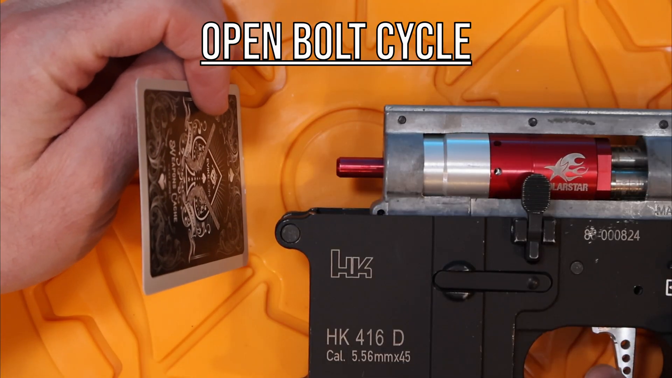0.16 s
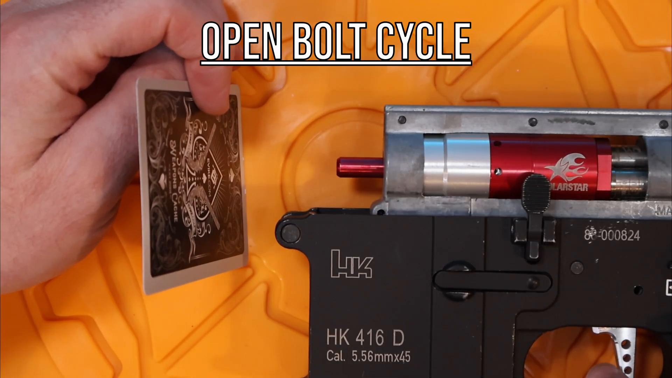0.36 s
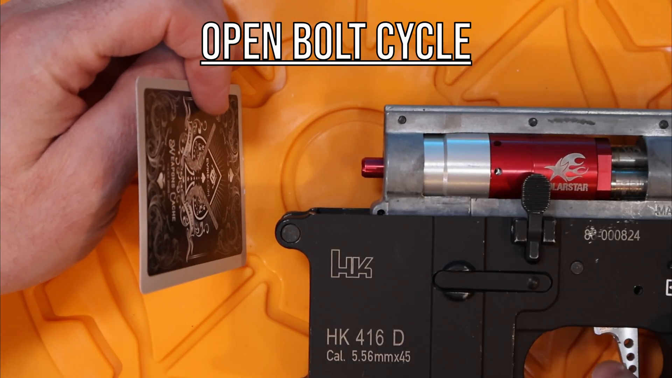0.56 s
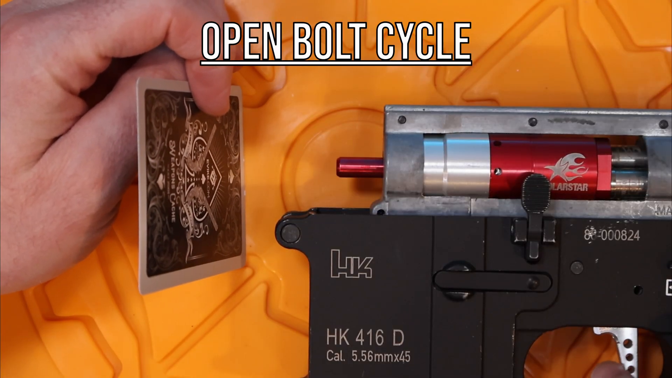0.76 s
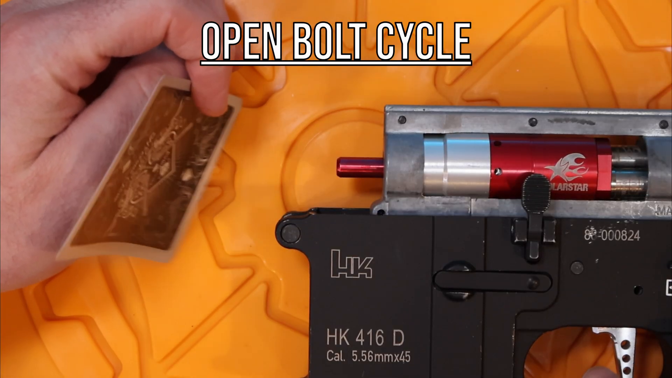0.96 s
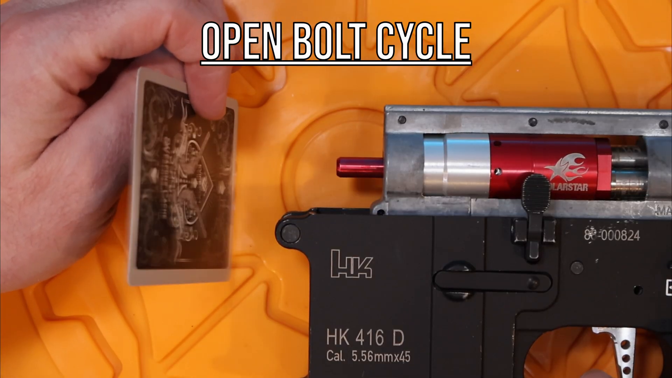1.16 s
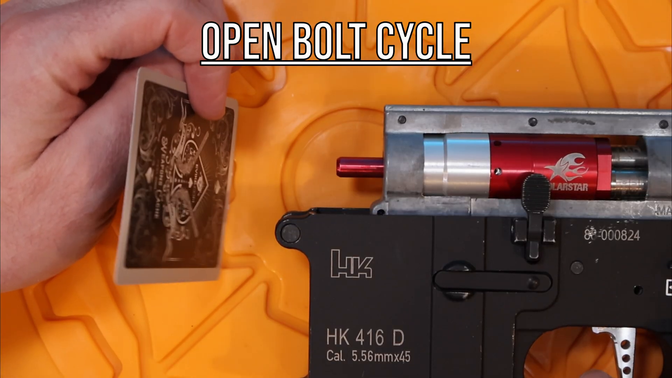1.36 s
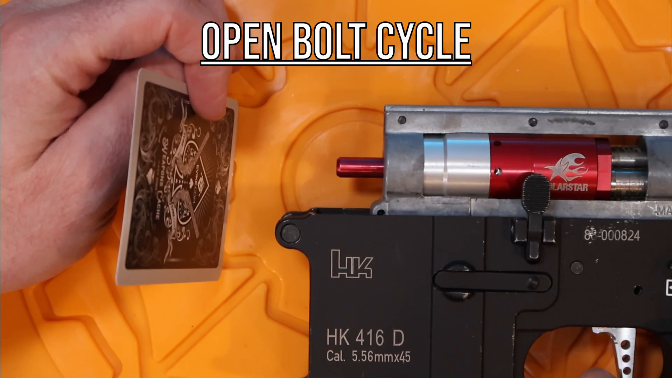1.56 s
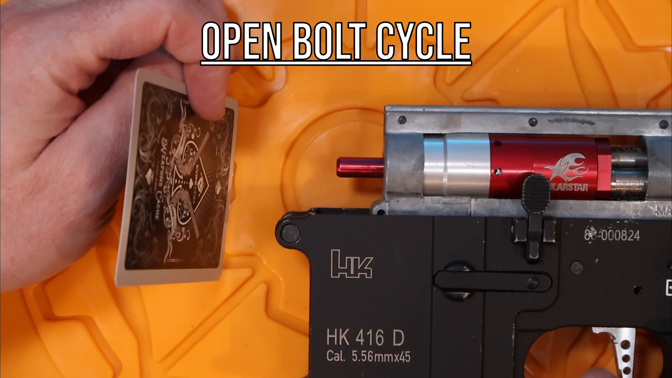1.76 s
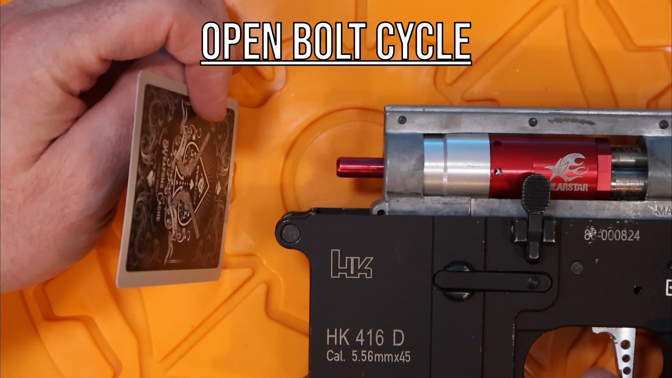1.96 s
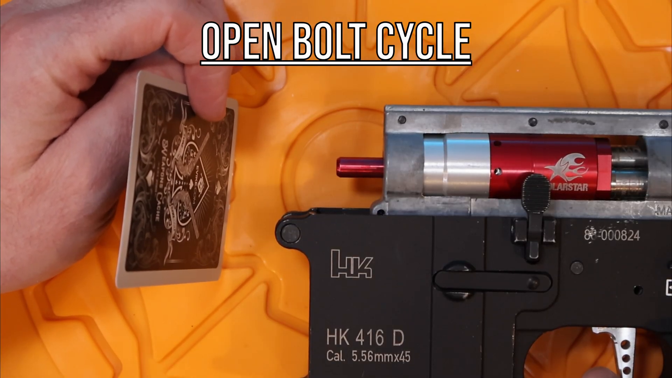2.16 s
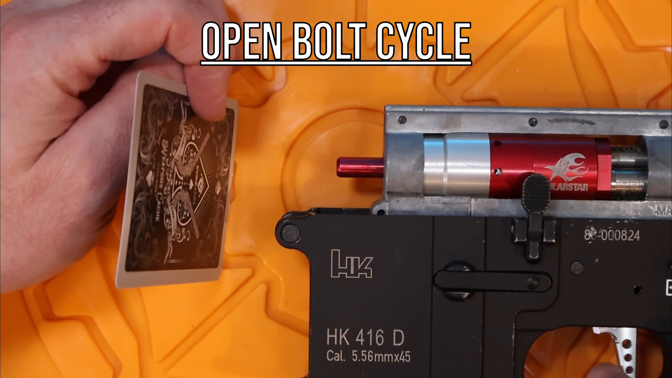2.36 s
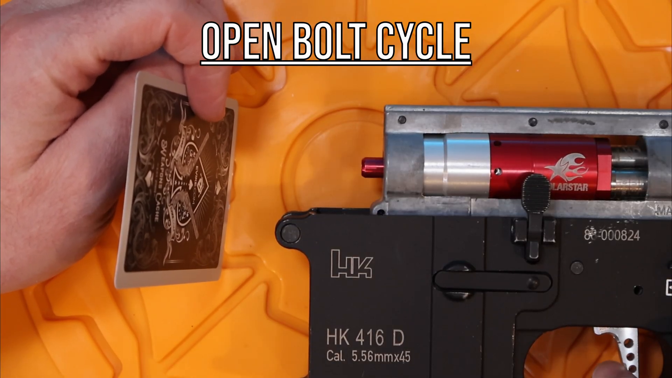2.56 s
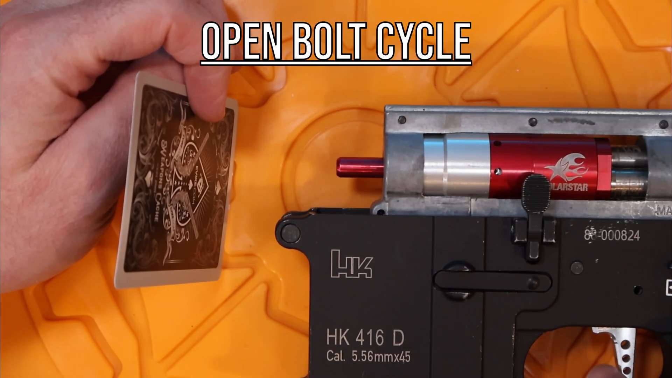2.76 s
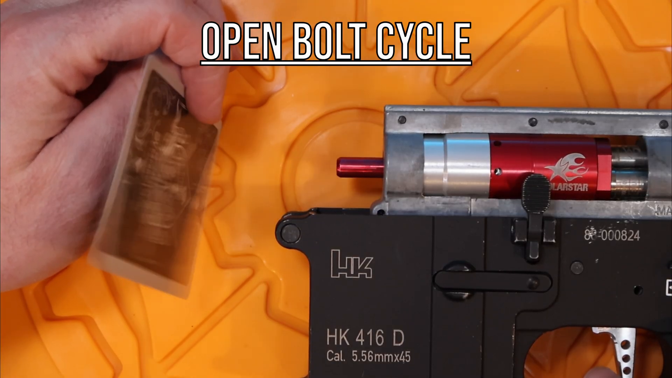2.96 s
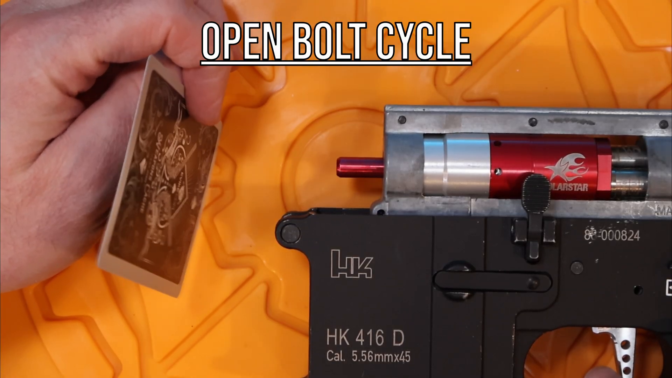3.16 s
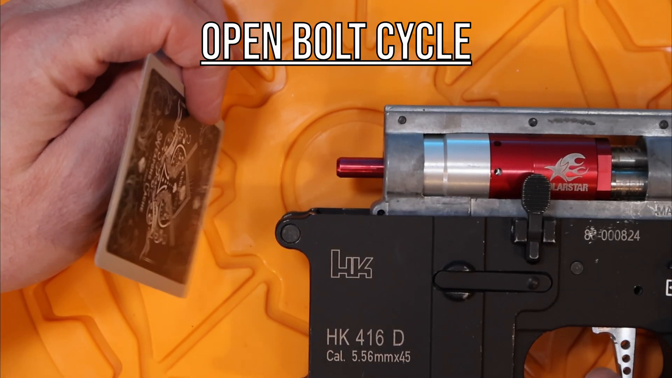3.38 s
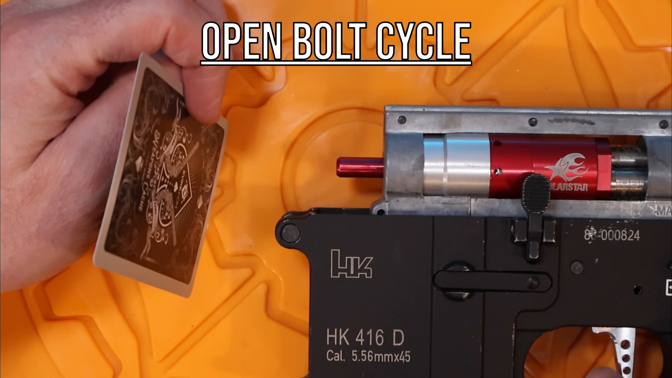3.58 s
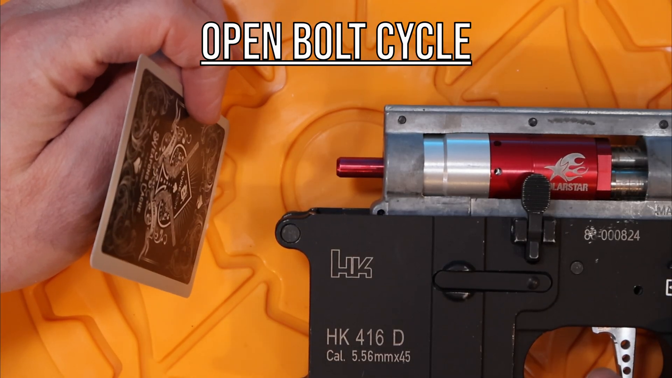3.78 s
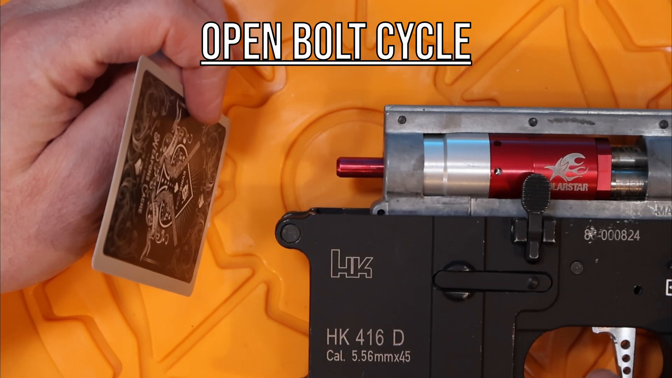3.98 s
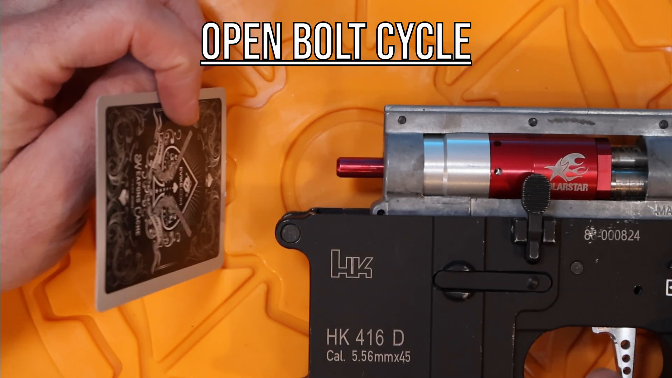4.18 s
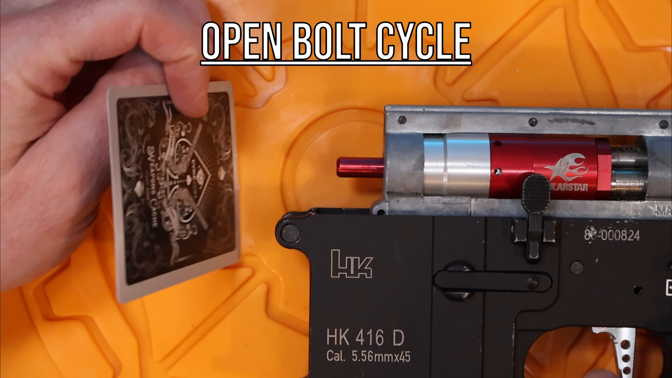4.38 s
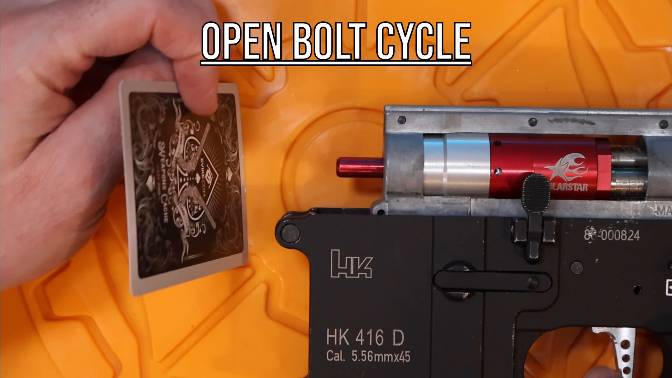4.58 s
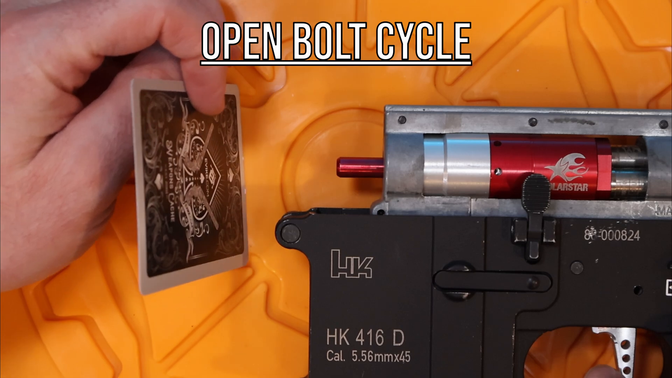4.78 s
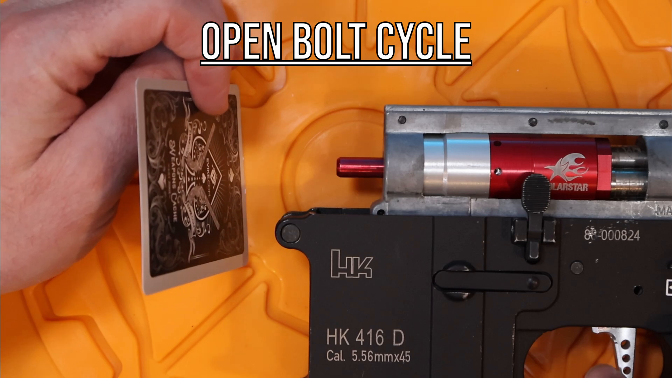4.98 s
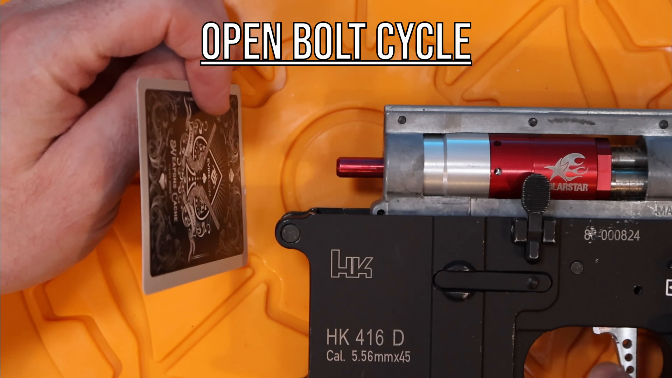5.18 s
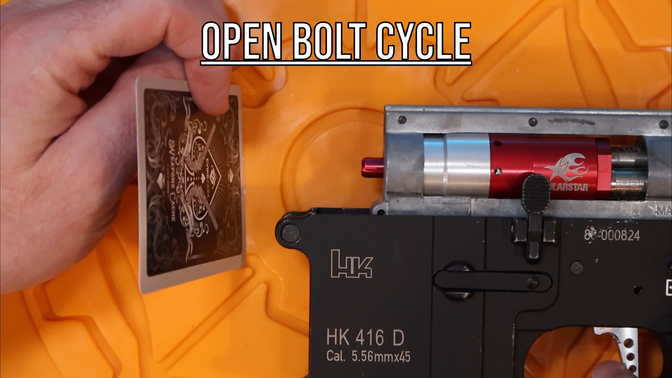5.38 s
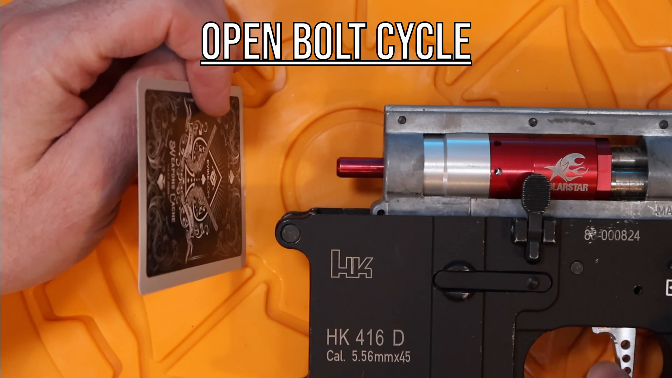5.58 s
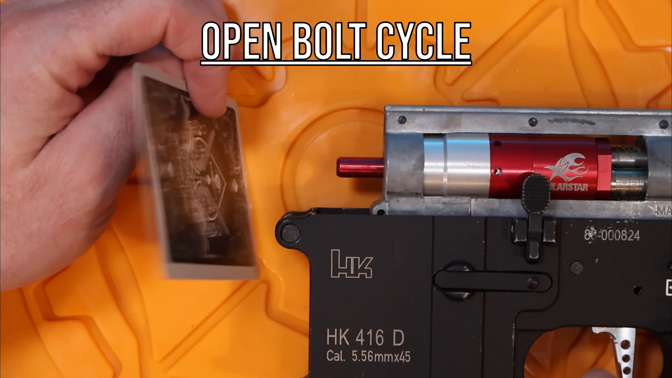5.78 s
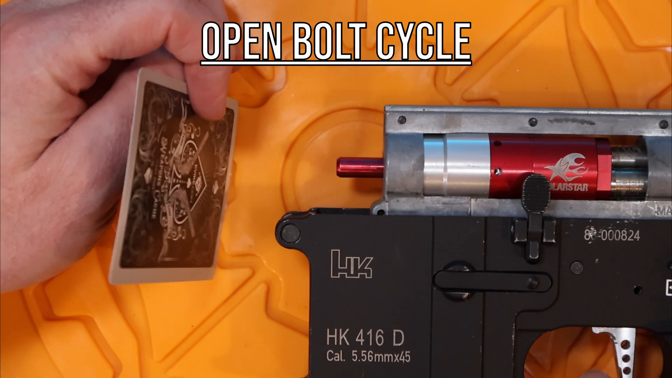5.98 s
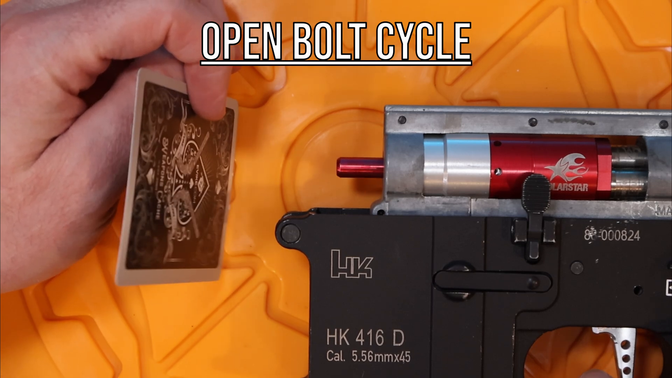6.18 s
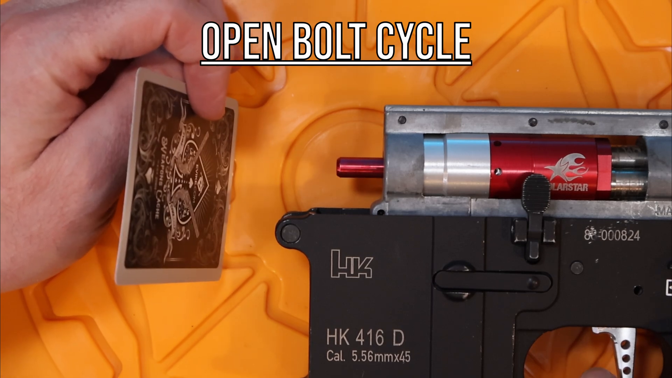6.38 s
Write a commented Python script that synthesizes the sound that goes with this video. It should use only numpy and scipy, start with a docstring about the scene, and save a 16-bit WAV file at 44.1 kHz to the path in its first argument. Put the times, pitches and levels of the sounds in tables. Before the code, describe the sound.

A faint low drone with a little hiss fills a small room throughout. At about 0.6 seconds an air-powered replica gun begins to cycle: its nozzle slams back with a ringing, rattling metallic click, pops forward with a short hiss at 0.8, and at 1.0 a sharp blast of air slaps a playing card, followed at once by a valve clacking shut. After tiny trigger ticks at 2.5 seconds, the same sequence runs from 2.6 to 3.1, with a softer slap on the card. Another faint tick comes at 4.6. The third firing runs from 5.4 to 5.9, with the firmest slap. Everything is slowed to half speed at normal pitch, so most hits have a brief stutter. The microphone is close, dipping in level and distorting slightly on the loudest hits, each trailed by a short room echo.

```python
"""In a small, droning room, an air-driven replica gun engine on a plastic case fires three times.
Each time its nozzle slams back, then pops forward with a hiss; a blast of air slaps a playing card,
and a valve clacks shut. Struck parts ring, and escaping air is a burst of noise. The close microphone
turns itself down at loud blows and distorts. Everything is then played at half speed by repeating
short slices, so most blows stutter."""
import sys
import numpy as np
from scipy import signal
from scipy.fft import rfft, irfft
from scipy.io import wavfile
from scipy.ndimage import uniform_filter1d

SR = 44100
rng = np.random.default_rng(int(sys.argv[2]) if len(sys.argv) > 2 else 0)


def put_to_file(sound):
    """Save the sound as 16-bit audio at rate SR, in the file named by the first command-line argument."""
    columns = np.atleast_2d(sound).T  # one column per channel
    safe = np.clip(columns, -1, 1)
    whole_steps = np.round(safe * 32767)
    wavfile.write(sys.argv[1], SR, whole_steps.astype(np.int16))


N = 284004
T = np.arange(SR // 2) / SR  # seconds within one blow, before slowing


def amp(db):
    """Turns decibels into a gain."""
    return 10 ** (np.asarray(db) / 20)


def curve_at(points, hz):
    """Reads a table between its rows at the given frequencies."""
    row_hz, value = np.transpose(points)
    return np.interp(np.log(hz + 1), np.log(row_hz + 1), value)


def add(mix, start_s, sound):
    """Mixes a sound in at a time counted before slowing."""
    part = mix[round(start_s * SR):][:len(sound)]
    part += sound[:len(part)]


def noise(spectrum, size):
    """Noise of strength 1, coloured by a table."""
    colour = amp(curve_at(spectrum, np.fft.rfftfreq(size, 1 / SR)))
    hiss = irfft(rfft(rng.standard_normal(size)) * colour, size)
    return hiss / hiss.std()


def ring(modes, scatter_s, crack_db):
    """A quick cluster of contacts makes a crack and tones that fade 60 dB in their ring time."""
    tones = sum(amp(db - 60 * T / ring_s) * np.sin(2 * np.pi * hz * T) for hz, db, ring_s in modes)
    contacts = rng.standard_normal(len(T)) * np.exp(-T / scatter_s)
    contacts[0] = 2 * np.linalg.norm(contacts)  # the first contact is the firmest
    crack = amp(crack_db) * contacts * (T > 0) / 3
    return signal.fftconvolve(tones, contacts / np.linalg.norm(contacts))[:len(T)] + crack


def gust(spectrum, db, rise_s, sag_db, hold_s, fall_s):
    """A burst of noise that starts fast, sags and is cut off."""
    rise = 1 - np.exp(-T / rise_s)
    sag = amp(sag_db * np.exp(-T / .0047))
    fall = np.exp(-np.maximum(T - hold_s, 0) / fall_s)
    return amp(db) * rise * sag * fall * noise(spectrum, len(T))


def bump(at_s, width_s):
    """One smooth push of air."""
    return np.exp(-((T - at_s) / width_s) ** 2)


# The drone's colour. Each row: frequency in Hz, level in dB.
DRONE_COLOUR = [(18, -74.5), (30, -37.5), (48, -31), (138, -8.5), (184, -11.5), (239, -1), (499, -20.5),
                (702, -16.5), (1010, -23.5), (1540, -24.5), (1860, -31), (3220, -32.5), (3490, -33.5),
                (13300, -43.5), (16000, -57.5)]
# Each row: frequency in Hz, how alike the drone is left and right (1 is the same, -1 opposite).
DRONE_LIKENESS = [(60, -0.36), (180, 1), (550, 0.89), (1650, 0.17), (4970, -0.28), (15000, -0.32)]
# The drone's drifting loudness. Each row: time in seconds after slowing, level in dB.
DRONE_LEVEL = [(0, -52.5), (.6, -48), (1.9, -51), (2.5, -48.5), (3.8, -50), (4.14, -51), (4.179, -56.5),
               (4.601, -52), (5.3, -50), (6.44, -52)]
def room_drone():
    """The air in the room carries a low drone and a faint hiss."""
    left, other = rfft(noise(DRONE_COLOUR, N)), rfft(noise(DRONE_COLOUR, N))
    alike = np.clip(curve_at(DRONE_LIKENESS, np.fft.rfftfreq(N, 1 / SR)), -1, 1)
    right = alike * left + np.sqrt(1 - alike ** 2) * other
    slowed_s, db = np.transpose(DRONE_LEVEL)
    return irfft(np.array([left, right]), N) * amp(np.interp(np.arange(N) / SR, slowed_s / 2, db))


# Each row: frequency in Hz, how alike the gun is left and right (1 is the same).
GUN_LIKENESS = [(100, 1), (400, .9), (1200, 0.98), (3000, 0.93), (6000, 0.65), (11000, 0.41), (15000, 0.65)]
# The gun's lean to one side. Each row: frequency in Hz, how much louder the left is in dB.
GUN_BALANCE = [(100, 4), (400, 0.55), (1000, -1.5), (8000, 0)]
def microphone_pair(centre, edge):
    """Two close microphone openings share the centre sound and get the edge sound with opposite signs."""
    hz = np.fft.rfftfreq(N, 1 / SR)
    alike = np.clip(curve_at(GUN_LIKENESS, hz), 0, 1)
    mid = rfft(centre)
    side = rfft(edge) * np.sqrt((1 - alike) / (1 + alike))
    lean = amp(curve_at(GUN_BALANCE, hz) / 2)
    return irfft(np.array([lean * (mid + side), (mid - side) / lean]), N)


# The room's echo. Each row: frequency in Hz, ring time in seconds before the extra fade and slowing.
ECHO_TIMES = [(150, 0.21), (600, .4), (1500, .6), (5000, 0.54), (9000, 0.31), (16000, 0.22)]
def room_echo(sound):
    """The walls give each ear a fading tail of noise."""
    hz, t, bands = signal.stft(rng.standard_normal((2, SR // 2)), SR, nperseg=256)
    alike = np.clip(curve_at(GUN_LIKENESS, hz) - .08, 0, 1)[:, None]
    bands[1] = alike * bands[0] + np.sqrt(1 - alike ** 2) * bands[1]
    tail = signal.istft(bands * amp(-60 * t / curve_at(ECHO_TIMES, hz)[:, None]), SR, nperseg=256)[1]
    age_s = np.arange(tail.shape[1]) / SR
    tail *= 1 - np.exp(-age_s / .003)
    tail *= np.exp(-(age_s / .27) ** 4)  # extra fade: holds a while, then drops away
    tail /= np.linalg.norm(tail[0])
    return signal.fftconvolve(sound[None], tail, axes=1)[:, :N]


# Faint ticks. Each row: start in seconds after slowing, level in dB, pitch in Hz.
TRIGGER_TICKS = [(2.521, -52, 2240), (2.538, -44, 1414), (4.579, -55, 2413)]
def trigger_ticks(mix):
    """A finger and the trigger make tiny two-tone ticks."""
    for slowed_s, db, hz in TRIGGER_TICKS:
        modes = [(hz, db, .02), (1.3 * hz, db + 2, .012)]
        add(mix, slowed_s / 2, ring(modes, scatter_s=.002, crack_db=db - 11.5))


# The tones of the solenoid (an electric magnet) and of the engine's shell.
# Each row: pitch in Hz, level in dB, ring time in seconds before slowing.
SOLENOID_TONES = [(1350, -14.5, 0.0075), (1900, -14.5, .012), (4100, -6.5, 0.009), (5000, -23.5, .009)]
SHELL_TONES = [(595, -14.5, 0.048), (1368, -11.5, 0.03), (1794, -17, 0.086), (1914, -16, 0.068),
               (2066, -8.5, .015), (4130, -2, .008), (4700, -13.5, 0.086), (5670, -7, 0.0078),
               (7600, -5.5, 0.027)]
# The shell's rattle. Each row: frequency in Hz, level in dB.
RATTLE_COLOUR = [(180, -47), (300, -15), (593, -12.5), (787, -26.5), (1360, -5.5), (1530, -13), (2070, 1.5),
                 (2280, -10.5), (5080, -14.5), (5520, -10), (16000, -30.5)]
def nozzle_back(mix, start_s):
    """The solenoid clicks, then the nozzle hits its rear stop, so the shell rings and rattles."""
    add(mix, start_s, ring(SOLENOID_TONES, scatter_s=.0015, crack_db=-28.5))
    slam = ring(SHELL_TONES, scatter_s=.0025, crack_db=10)
    rattle = gust(RATTLE_COLOUR, db=-10.5, rise_s=.00026, sag_db=4.9, hold_s=.0027, fall_s=.02)
    add(mix, start_s + .0034, slam + rattle)


# Escaping air. Each row: frequency in Hz, level in dB.
VENT_COLOUR = [(200, -36.5), (900, -8.5), (1700, 0.5), (3290, -15.5), (3880, -9.5), (5300, -9.5),
               (6050, -5), (6600, -10), (7300, -8), (10300, -8.5), (11600, -1), (13300, -7), (15300, -1.5),
               (16000, -8.5)]
# The nozzle's seat. Each row: pitch in Hz, level in dB, ring time in seconds before slowing.
SEAT_TONES = [(581.7, -17.5, 0.035), (1705, -10, 0.049), (1768, -10, 0.04), (1944, -8.5, 0.05),
              (2080, -10, 0.035)]
def nozzle_forward(mix, start_s):
    """Air escapes with a pop and a hiss, then the nozzle lands on its seat."""
    pop = 1.1 * bump(.0007, .00028) - .2 * bump(.0002, .0002)
    rebound = .25 * bump(.0042, .001) - .5 * bump(.002, .0009)
    hiss = gust(VENT_COLOUR, db=-8.5, rise_s=.0008, sag_db=7.1, hold_s=.012, fall_s=.002)
    add(mix, start_s, pop + rebound + hiss)
    add(mix, start_s + .012, ring(SEAT_TONES, scatter_s=.0023, crack_db=-18.5))


# The valve's tones. Each row: pitch in Hz, level in dB, ring time in seconds before slowing.
VALVE_TONES = [(913, -7, 0.034), (1153, -7, 0.067), (1212, 1, 0.027), (3276, -18, .08), (4210, -16, 0.033),
               (8720, -17, 0.0095)]
def valve_shut(mix, start_s):
    """The valve clacks shut and bounces once."""
    add(mix, start_s, ring(VALVE_TONES, scatter_s=.00027, crack_db=-2.5))
    add(mix, start_s + .0075, amp(-7.5) * ring(VALVE_TONES, scatter_s=.0008, crack_db=-12.5))


# The card's low tones. Each row: pitch in Hz, level in dB, ring time in seconds before slowing.
CARD_TONES = [(107.6, -5.5, 0.04), (179.3, -5.5, 0.035), (296, 0.5, 0.014), (480, -3, 0.015)]
def card_slap(mix, start_s, db):
    """The blast slaps a playing card, which moves in the hand, so each slap has its own level."""
    add(mix, start_s, amp(db) * ring(CARD_TONES, scatter_s=.0014, crack_db=-49))


# The jet of air. Each row: frequency in Hz, level in dB.
JET_COLOUR = [(88, -21), (150, -9), (201, -21), (612, -22.5), (805, -18.5), (1210, -7), (1290, -3),
              (1560, -6.5), (1980, -6), (2870, -10), (3620, -8), (8560, -12), (16000, -15)]
# Air in the nozzle tube. Each row: pitch in Hz, level in dB, ring time in seconds before slowing.
TUBE_TONES = [(1853, 9.5, .005), (562.3, -6, 0.012)]
def air_shot(mix, start_s):
    """The valve stirs with a shudder and a hiss, then air blasts out and rings the nozzle tube."""
    lead_s = .0125
    shudder = amp(-11.5) * np.sin(2 * np.pi * 270 * T) * (1 - np.exp(-T / .0046)) * (T < lead_s)
    hiss = gust(JET_COLOUR, db=-19, rise_s=.0015, sag_db=.1, hold_s=.024, fall_s=.001)
    add(mix, start_s - lead_s, shudder + hiss)
    blast = 1.8 * bump(.0014, .00037) - .55 * bump(.0023, .0023)  # a push, then the swing back
    tube = ring(TUBE_TONES, scatter_s=.0001, crack_db=4.2)
    jet = gust(JET_COLOUR, db=-10, rise_s=.0014, sag_db=13, hold_s=.042, fall_s=.0045)
    add(mix, start_s, blast + tube + jet)


# The three firings. Each row: the starts of nozzle back, nozzle forward, shot and valve shut
# in seconds after slowing, then the card's level in dB.
FIRINGS = [(.6212, .8196, 1.0234, 1.1075, 2.5), (2.5605, 2.7688, 2.9640, 3.0487, -3),
           (5.3764, 5.5744, 5.7822, 5.8616, 4)]
def gun():
    """All blows and ticks heard from one direction; each call has its own fine detail."""
    mix = np.zeros(N)
    for *slowed_s, card_db in FIRINGS:
        back_s, forward_s, shot_s, shut_s = np.divide(slowed_s, 2)
        nozzle_back(mix, back_s)
        nozzle_forward(mix, forward_s)
        air_shot(mix, shot_s)
        card_slap(mix, shot_s + .001, card_db)
        valve_shut(mix, shut_s)
    trigger_ticks(mix)
    return mix


def scene():
    """Gun, echo and drone at natural speed; the firings all fall in the first half."""
    centre, edge = gun(), gun()
    return microphone_pair(centre, edge) + amp(-14.5) * room_echo(centre) + room_drone()


# The two slices that make each blow stutter. Each row: start in seconds after slowing,
# length of the first slice in milliseconds, length of the second in milliseconds.
STUTTER_SLICES = [(.6287, 12.91, 7.14), (.8277, 8.68, 10.31), (1.0065, 10.81, 10.73), (1.0917, 12.74, 4.04),
                  (2.5428, 16.85, 6.55), (2.7643, 9.74, 4.98), (2.9512, 9.77, 7.08), (3.0329, 12.74, 4.04),
                  (5.3841, 12.91, 7.14), (5.5828, 10.24, 15.02), (5.7540, 13.48, 10.73),
                  (5.8459, 12.73, 4.04)]
def half_speed(sound):
    """Each slice fades back into the one before it, then plays whole: twice as long, same pitch."""
    shortest, longest, compared = 200, 700, 400  # samples, for slices not in the table
    sound = np.pad(sound, ((0, 0), (SR, 0)))
    plan = {SR + round(slowed_s / 2 * SR): [round(ms * SR / 1000) for ms in lengths_ms]
            for slowed_s, *lengths_ms in STUTTER_SLICES}
    pieces, queue, at = [], [], SR
    while 2 * (at - SR) < N:
        queue = list(plan.get(at, queue))
        gap = min([start - at for start in plan if start > at] + [SR])
        if queue:
            size = queue.pop(0)
        elif gap < longest + shortest:  # land exactly on the next stutter
            size = gap if gap < longest else gap // 2
        else:  # pick the length at which the wave repeats best
            behind = sound[0, at - longest:at + compared - shortest]
            match = np.correlate(behind, sound[0, at:at + compared])[::-1]
            size = shortest + np.argmax(match)
        before, current = sound[:, at - size:at], sound[:, at:at + size]
        height = abs(current[0])
        is_blow = height.max() > 6 * before[0].std()
        onset = np.argmax(height > height.max() / 2) * is_blow
        fade_size = onset - 40 if onset > .4 * size else size  # a late blow is not played early
        fade = np.minimum(np.arange(size) / fade_size, 1)
        pieces += [(1 - fade) * current + fade * before, current]
        at += size
    return np.hstack(pieces)[:, :N]


def record(dry):
    """The level drops at loud blows and creeps back, peaks are flattened, and the sound is slowed."""
    dry = signal.lfilter(*signal.butter(2, 55, "high", fs=SR), dry)  # the microphone loses deep bass
    threshold_db, duck_share, top_hz = -18.5, .55, 16250
    power_db = 10 * np.log10(abs(uniform_filter1d((dry ** 2).mean(0), 200)) + 1e-12)
    sink_db = np.arange(N) * 91.0 / SR
    held_db = np.maximum.accumulate(power_db + sink_db) - sink_db  # each peak is held, sinking steadily
    over_db = np.maximum(held_db - threshold_db, 0)
    late_db = signal.lfilter([1 / 300], [1, 1 / 300 - 1], over_db)  # the gain takes a moment to move
    slow = half_speed(np.clip(dry * amp(-duck_share * late_db), -1, 1))
    treble_cut = signal.firwin(255, top_hz, window=("kaiser", 6), fs=SR)
    return np.clip(signal.oaconvolve(slow, treble_cut[None], "same"), -1, 1)


dry = scene()
out = record(dry)
put_to_file(out)
```